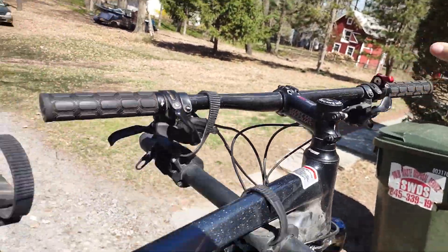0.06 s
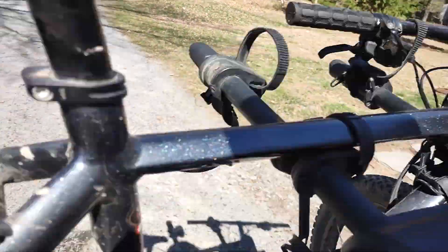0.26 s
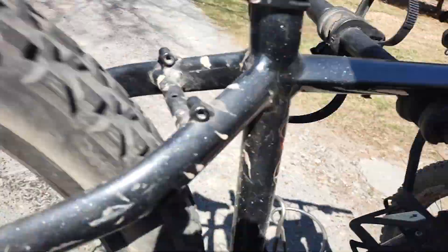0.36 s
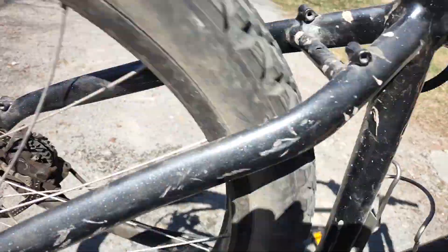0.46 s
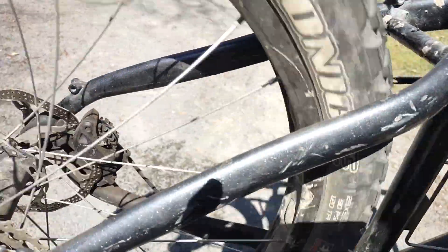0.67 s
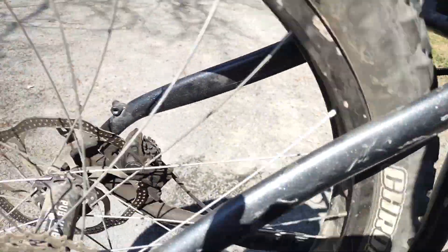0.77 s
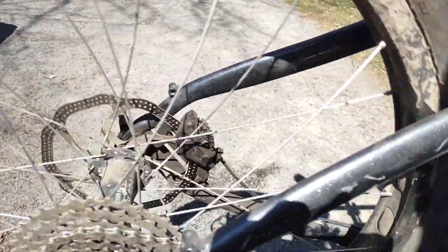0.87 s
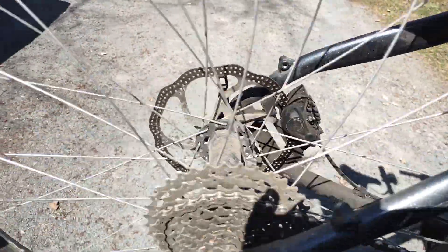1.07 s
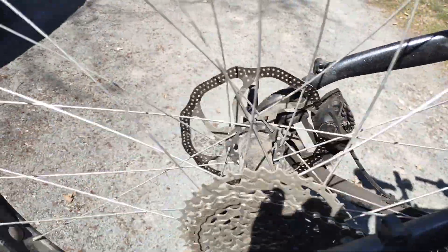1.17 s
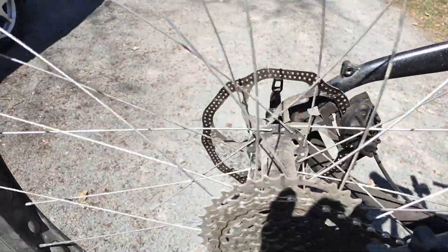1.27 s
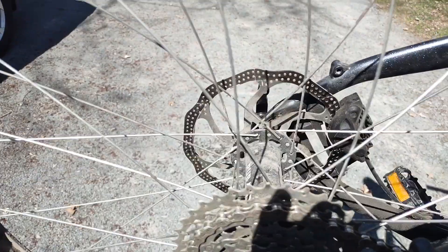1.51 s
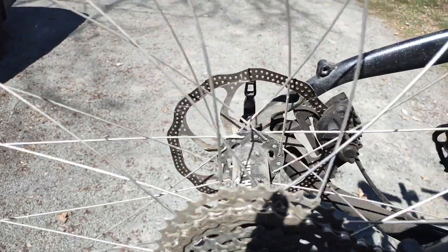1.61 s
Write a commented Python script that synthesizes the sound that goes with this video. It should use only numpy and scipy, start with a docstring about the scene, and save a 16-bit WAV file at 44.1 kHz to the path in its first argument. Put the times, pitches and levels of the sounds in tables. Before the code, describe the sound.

A bicycle freewheel clicks in a fast metallic whirr, then stops with a gritty gravel scuff.

```python
"""Bicycle freewheel over gravel

A bicycle rolls over a gravel drive, its freewheel whirring as two pawls drop in turn and ring hub, wheel and frame.
The microphone moves from the handlebar down to the rear hub while noise-burst wind buffets its left port.
The wheel stops, a shoe scuffs gritty noise from the gravel, and parts and stones tick and knock as short
rings. Coloured noise makes the quiet outdoor air."""
import sys
import numpy as np
from scipy import signal
from scipy.fft import rfft, irfft
from scipy.io import wavfile

SR = 44100
rng = np.random.default_rng(int(sys.argv[2]) if len(sys.argv) > 2 else 0)


def pcm_store(signal):
    """Save signal as 16-bit PCM."""
    levels = np.round(np.clip(np.atleast_2d(signal), -1, 1) * 32767)
    wavfile.write(sys.argv[1], SR, levels.astype(np.int16).T)


N = 72765
TIME = np.arange(N) / SR

# Stereo image of sound from the ground and around.
# Each row: frequency in Hz, left-right likeness (0-1), left minus right level in dB.
SURROUNDINGS = [(78, 0.28, 8.5), (278, 1, 0), (1070, 0.26, 0), (2560, 0, -1), (5940, 0, -15), (8700, 0, 1),
                (15000, 0, -4)]


def from_db(db):
    """Decibels to amplitude gain."""
    return 10 ** (np.asarray(db) / 20)


def rms_one(x):
    """Scale to unit rms over all channels."""
    return x / np.sqrt(np.mean(x ** 2) + 1e-20)


def in_time(rows):
    """Interpolate each column of a control curve at every sample."""
    time_s, *columns = np.transpose(rows)
    return [np.interp(TIME, time_s, column) for column in columns]


def at_hz(rows, hz):
    """Interpolate each column of a spectrum over log frequency."""
    row_hz, *columns = np.transpose(rows)
    return [np.interp(np.log(hz), np.log(row_hz), column) for column in columns]


def pan(left_minus_right_db):
    """Left and right gains for a level difference."""
    return from_db(np.array([[.5], [-.5]]) * left_minus_right_db)


def band(x, low_hz, high_hz, order=2):
    """Causal band-pass, at least 2 % wide."""
    high_hz = min(max(high_hz, low_hz * 1.02), .48 * SR)
    sos = signal.butter(order, [low_hz, high_hz], "band", fs=SR, output="sos")
    return signal.sosfilt(sos, x + 1e-18)


def flicker(grain_s):
    """Random wobble of unit rms, interpolated between knots one grain apart."""
    knots = rng.standard_normal(N)
    return rms_one(np.interp(TIME / grain_s, np.arange(N), knots))


def burst(t_s, attack_s, hold_s, t60_s):
    """Amplitude envelope: exponential rise, hold, then 60 dB of decay per t60."""
    t_s = np.maximum(t_s, 0)
    rise = 1 - np.exp(-t_s / attack_s)
    decay = from_db(-60 * np.maximum(t_s - hold_s, 0) / t60_s)
    return rise * decay


def outdoor_noise(spectrum, grains=1):
    """Coloured stereo noise; a mid-side mix sets how alike the channels are at each frequency."""
    hz = np.maximum(np.arange(N // 2 + 1) * SR / N, 1)
    alike, pan_db = at_hz(SURROUNDINGS, hz)
    alike = np.clip(alike, 0, 1)
    mid, side = rfft(grains * rng.standard_normal((2, N)))
    stereo = np.sqrt(1 + alike) * mid + np.sqrt(1 - alike) * side * [[1], [-1]]
    colour = from_db(at_hz(spectrum, hz)[0])
    return rms_one(irfft(stereo * pan(pan_db) * colour, N))


def air():
    """Quiet outdoor background: coloured noise with a slowly varying level."""
    # Background spectrum. Each row: frequency in Hz, relative level in dB per Hz.
    air_colour = [(18, -55), (30, -30), (143, -10.5), (176, -6), (260, -21.5), (472, -18.5), (538, -19),
                  (815, -18.5), (1410, -27), (4090, -34), (4900, -34.5), (6880, -43.5), (15000, -44)]
    # Background loudness. Each row: time in seconds, level in dB.
    air_level = [(0, -64.5), (.2, -71.5), (.55, -55.5), (.95, -58.5), (1.15, -51), (1.35, -55), (1.47, -55),
                 (1.65, -56.5)]
    return from_db(in_time(air_level)[0]) * outdoor_noise(air_colour)


def wind():
    """Low-passed eddies thump the left port over a constant soft rumble; stronger ones reach higher."""
    # Wind buffets. Each row: centre in seconds, Gaussian sigma in seconds, level in dB.
    buffets = [(0.223, 0.01, -25), (0.246, 0.0092, -44), (0.278, 0.015, -28.5), (0.313, 0.015, -28),
               (0.352, 0.0077, -17.5), (.377, 0.0049, -21.5), (.423, 0.0017, -19), (0.433, 0.025, -32),
               (0.473, 0.017, -27.5), (0.525, 0.017, -30), (0.576, 0.014, -40.5), (0.616, 0.06, -47.5),
               (0.766, 0.017, -45.5), (0.849, 0.017, -35.5), (0.939, 0.033, -36), (0.992, 0.061, -41),
               (1.115, 0.0088, -31), (1.143, 0.043, -43), (1.392, 0.01, -47)]
    low_hz, top_hz, reference_db, db_per_octave = 64.2, 141.8, -32.5, 23  # top_hz holds at reference_db
    fray_db, fray_hz = -19, 389.5  # fine turbulence against the eddy, at reference_db
    right_db = -31
    breeze_db, breeze_hz, breeze_pan_db = -67.5, 92, -0.5
    buffeting = np.zeros((2, N))
    for centre_s, sigma_s, level_db in buffets:
        white = rng.standard_normal((2, N))
        force = 2 ** ((level_db - reference_db) / db_per_octave)
        eddy = rms_one(band(white, low_hz, top_hz * force, order=3))
        fray = force ** 2 * rms_one(band(white[::-1], fray_hz / 2, fray_hz, order=3))
        swell = np.exp(-((TIME - centre_s) / sigma_s) ** 2 / 2)
        gust = (eddy + from_db(fray_db) * fray) * swell
        gust = gust / gust.std(axis=1, keepdims=True) * np.sqrt(np.mean(swell ** 2))
        buffeting += from_db(level_db) * gust
    breeze = rms_one(band(rng.standard_normal((2, N)), breeze_hz * 0.55, breeze_hz * 1.37))
    return buffeting * from_db([[0], [right_db]]) + from_db(breeze_db) * pan(breeze_pan_db) * breeze


def gravel():
    """A shoe presses and scuffs the gravel: bursts of coloured noise with a fine random grit."""
    # Shoe contacts. Each row: start in seconds, level in dB, attack in seconds, t60 in seconds.
    steps = [(1.026, -47, 0.019, 0.4), (1.071, -46, 0.009, 0.53), (1.112, -47, 0.005, 0.22),
             (1.145, -38, 0.0037, 0.089), (1.184, -43, 0.01, 0.45), (1.216, -34, 0.0011, 0.16),
             (1.243, -45, 0.0035, 0.12), (1.34, -50.5, 0.018, 0.39), (1.376, -55, .008, 0.18)]
    # Gravel spectrum. Each row: frequency in Hz, relative level in dB per Hz.
    step_colour = [(35, -37), (60, 7), (107, 0.5), (263, -0.5), (526, 1), (1030, -8), (1150, 0),
                   (2590, -13.5), (4110, -32), (5180, -27), (8040, -35), (15000, -79)]
    crunch_db, crunch_grain_s = 4, 0.00043
    energy = 0
    for start_s, level_db, attack_s, t60_s in steps:
        step = from_db(level_db) * burst(TIME - start_s, attack_s, attack_s, t60_s)
        energy = energy + step ** 2
    grains = from_db(crunch_db * flicker(crunch_grain_s))
    return np.sqrt(energy) * outdoor_noise(step_colour, grains=grains)


def contacts(rows, t60_s, width, splash_db, attack_s, hold_s):
    """Small hard contacts, each a short ring of band noise with a splash of treble."""
    out = np.zeros((2, N))
    for start_s, level_db, ring_hz in rows:
        grit = rng.standard_normal((2, N))
        ring = rms_one(band(grit, ring_hz / (1 + width), ring_hz * (1 + width)))
        splash = from_db(splash_db) * rms_one(band(grit, 1700, 8800, order=1))
        envelope = from_db(level_db) * burst(TIME - start_s, attack_s, hold_s, t60_s)
        out += envelope * (ring + splash) * pan(at_hz(SURROUNDINGS, ring_hz)[1])
    return out


def ticks():
    """Soft little rattles of the settling drivetrain, with a strong treble splash."""
    # Drivetrain ticks. Each row: start in seconds, level in dB, ring in Hz.
    tick_rows = [(1.305, -67, 5400), (1.313, -59, 4170), (1.334, -62, 5300), (1.364, -61.5, 5460),
                 (1.38, -63, 5900), (1.419, -56.5, 2960), (1.448, -63, 5000), (1.462, -59, 3900),
                 (1.486, -53.5, 3600), (1.517, -66, 5060), (1.545, -60, 5100), (1.576, -57, 4970),
                 (1.624, -57.5, 4930)]
    return contacts(tick_rows, t60_s=0.037, width=0.27, splash_db=-3, attack_s=0.0022, hold_s=0.0031)


def knocks():
    """Loose stones and bicycle parts knock with a sharper attack and little splash."""
    # Knocks. Each row: start in seconds, level in dB, ring in Hz.
    knock_rows = [(.422, -50, 640), (.55, -48, 694), (.707, -42, 850), (.888, -41, 1285), (.896, -43, 1020),
                  (.95, -38.5, 1160), (1.026, -38, 743), (1.038, -43, 610), (1.092, -40, 440),
                  (1.129, -38, 1220), (1.202, -53, 4900), (1.211, -61, 4930), (1.219, -45.5, 4440),
                  (1.22, -39.5, 1190), (1.224, -43, 463), (1.226, -41.5, 2700), (1.231, -63, 6660),
                  (1.249, -46, 1020), (1.364, -50.5, 1130), (1.388, -52, 1000), (1.616, -50, 2560)]
    return contacts(knock_rows, t60_s=.04, width=0.26, splash_db=-27, attack_s=0.00068, hold_s=0.00092)


def pawl_drops():
    """Impulse energies of two pawls, each dropping once per tooth as the wheel slows, then is braked."""
    first_s, tooth_s, slowing_s_per_tooth, teeth = .0073, .018696, .000048, 53
    brake_s, brake_teeth = .0248, 1.05  # delay of the last tooth, teeth over which braking builds up
    second_pawl_place, second_pawl_db = .365, -1.1  # place as a fraction of a tooth
    spread_db, jitter_s = 1.38, .0002
    tooth = np.arange(teeth)[:, None] + np.array([0, second_pawl_place])
    drop_s = first_s + tooth_s * tooth + slowing_s_per_tooth * tooth ** 2 / 2
    drop_s = drop_s + brake_s * np.exp((tooth - teeth + 1) / brake_teeth)
    drop_s = drop_s + jitter_s * rng.standard_normal(drop_s.shape)
    drop_db = np.array([0, second_pawl_db]) + spread_db * rng.standard_normal(drop_s.shape)
    drops = np.zeros(N)
    drops[np.clip(drop_s * SR, 0, N - 1).astype(int)] = from_db(drop_db) ** 2
    return drops


def struck(drops, body):
    """Every drop chatters into the body's clusters of close modes, each dying at its own rate."""
    attack_s, chatter_s, rough_db = 0.00026, 0.0035, 1.5
    rough = from_db(rough_db * flicker(chatter_s / 10))
    out = 0
    for low_hz, high_hz, left_db, right_db, t60_s in body:
        decay_energy = burst(TIME[:N // 4], attack_s, chatter_s, t60_s) ** 2
        energy = signal.fftconvolve(drops, decay_energy)[:N]
        chatter = rms_one(np.sqrt(np.abs(energy))) * rough * rng.standard_normal((2, N))
        out = out + from_db([[left_db], [right_db]]) * band(chatter, low_hz, high_hz)
    return rms_one(out)


def wheel_ring(drops):
    """Each drop strikes every clear wheel mode, a two-pole resonator, with a random strength."""
    # Clearest metal modes of the wheel. Each row: frequency in Hz, relative level in dB.
    wheel_modes = [(1290, 8.5), (1350, 3.5), (1548, 0.5), (1811, 6), (1950, 4.5), (2633, 6.5), (4193, -12),
                   (4342, -14), (4597, 2.5), (4880, 7), (5170, 6), (5360, 6)]
    ring_cycles = 420  # cycles to fall 60 dB
    out = 0
    for hz, level_db in wheel_modes:
        radius = from_db(-60 * hz / (ring_cycles * SR))
        angle = 2 * np.pi * hz / SR
        blows = np.sqrt(drops) * rng.standard_normal((2, N))
        poles = [1, -2 * radius * np.cos(angle), radius * radius]
        mode = signal.lfilter([0, np.sin(angle)], poles, blows + 1e-18)
        out = out + from_db(level_db) * rms_one(mode)
    return rms_one(out) * pan(-1)


def freewheel():
    """Pawl drops ring hub, wheel and frame; levels and pan follow the microphone toward the hub."""
    # Bright ring of hub and sprockets.
    # Each row: low edge in Hz, high edge in Hz, left and right relative levels in dB per Hz, t60 in seconds.
    hub = [(2300, 3030, -1, 3.5, 0.076), (3020, 3400, -3.5, -1, 0.072), (3905, 4780, 1, 8.5, 0.036),
           (4720, 5740, -12, 8.5, 0.026), (5800, 7140, -29, -0.5, 0.044), (7070, 9200, 0, -1.5, 0.033),
           (8900, 9840, 1, -9, 0.013), (9730, 11260, 1, -4, 0.035), (11430, 12400, -16, 1.5, .028),
           (12240, 14200, 0.5, -12, 0.036), (14200, 13200, 0, 3, 0.025), (15440, 17580, 1, 6, 0.016)]
    # Lower ring of wheel and frame.
    # Each row: low edge in Hz, high edge in Hz, left and right relative levels in dB per Hz, t60 in seconds.
    frame = [(850, 1330, -11.5, -9.5, 0.025), (1257, 1423, 2, -0.5, 0.053), (1488, 1679, 2.5, 3.5, 0.25),
             (1800, 2063, 4, 2, 0.042)]
    # Nearness to the hub.
    # Each row: time in seconds, hub ring level in dB, frame ring level in dB, left minus right in dB.
    nearness = [(0, -53.5, -59, 2.5), (.15, -53.5, -63.5, 2.5), (.3, -52, -53.5, 1.5), (.43, -47, -49.5, 5),
                (.55, -46, -48, 3), (.68, -42, -49.5, 1), (.82, -42, -50.5, -1), (.95, -41, -46, -1.5),
                (1.045, -40.5, -45, -1.5), (1.068, -45.5, -46.5, -4), (1.095, -42, -47, -2.5)]
    wheel_db = -11  # against the hub ring
    hub_db, frame_db, pan_db = in_time(nearness)
    drops = pawl_drops()
    metal = struck(drops, hub) + from_db(wheel_db) * wheel_ring(drops)
    return pan(pan_db) * (from_db(hub_db) * metal + from_db(frame_db) * struck(drops, frame))


def scene():
    """Sum of all sources at the microphone."""
    return air() + wind() + gravel() + ticks() + knocks() + freewheel()


def record(dry):
    """Roll off the deep bass and cut the top steeply."""
    low_cut_hz, top_cut_hz = 59, 15780
    high_pass = signal.butter(2, low_cut_hz, "high", fs=SR, output="sos")
    low_pass = signal.ellip(12, .1, 80, top_cut_hz, fs=SR, output="sos")
    return signal.sosfilt(low_pass, signal.sosfilt(high_pass, dry))


dry = scene()
out = record(dry)
pcm_store(out)
```